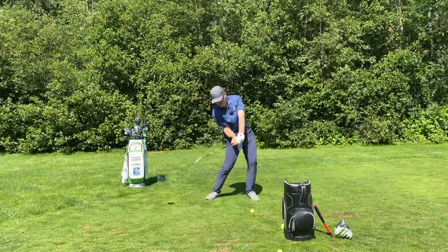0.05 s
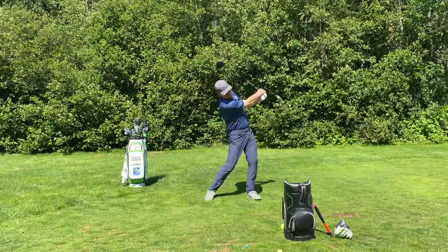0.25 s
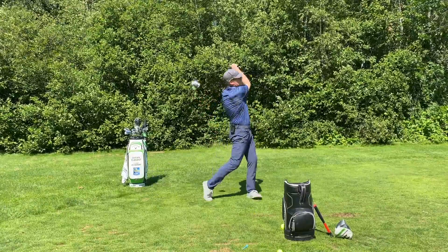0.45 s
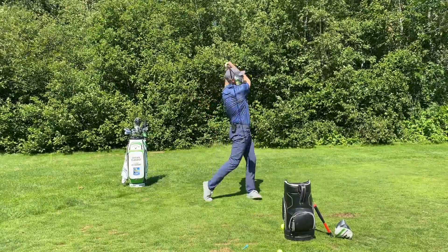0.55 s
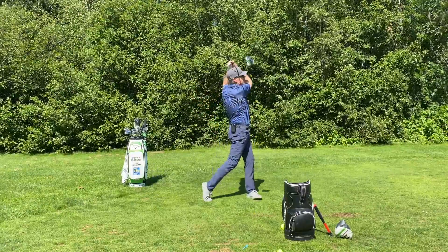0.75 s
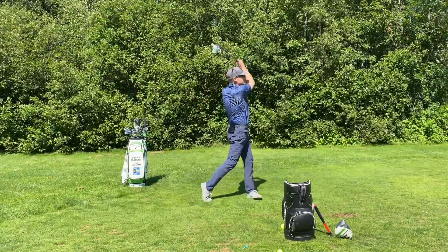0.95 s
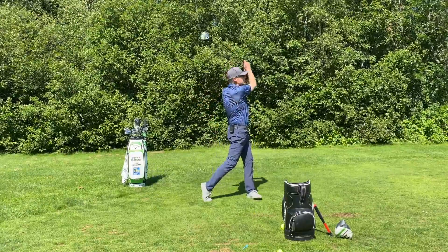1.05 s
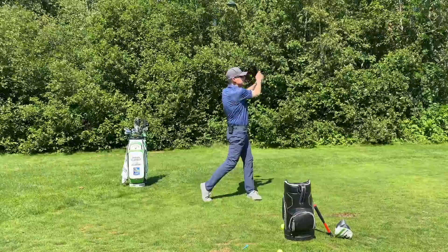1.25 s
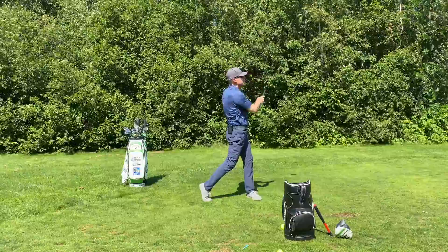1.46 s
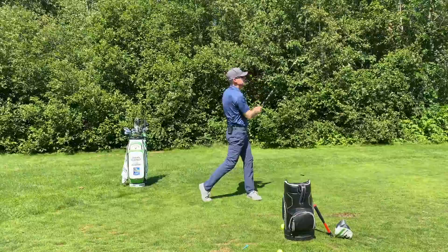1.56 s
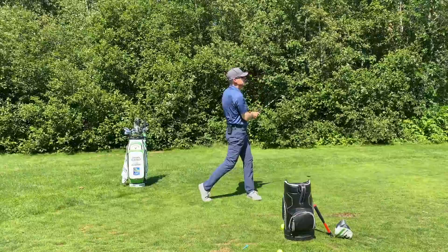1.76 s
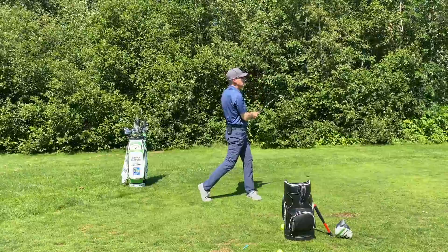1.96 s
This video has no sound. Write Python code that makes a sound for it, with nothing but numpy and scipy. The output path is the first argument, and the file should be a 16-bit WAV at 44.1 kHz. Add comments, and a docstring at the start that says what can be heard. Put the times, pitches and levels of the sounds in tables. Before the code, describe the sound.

Sharp metallic golf shot after a quick swish, fading into trees and a soft outdoor hush

```python
"""A golf driver cracks a ball off the tee: damped modes give a hollow knock, then the metal head rings.
Bursts of filtered noise add the shell's clash, and the crack briefly overloads the microphone.
Turf, trees and farther woods scatter it back as decaying noise; the club's swish is vortex tone and air rush.
Wind rumble dies away to a quiet outdoor hush of shaped noise, with soft scuffs of narrow-band noise.
Small clicks of gear, each a damped mode with a noise tick, come at the end."""
import sys
import numpy as np
from scipy import signal
from scipy.fft import rfft, irfft
from scipy.io import wavfile

SR = 44100
rng = np.random.default_rng(int(sys.argv[2]) if len(sys.argv) > 2 else 0)


def master(y):
    """Save y as 16-bit WAV."""
    cut = np.clip(np.atleast_2d(y).T, -1, 1)
    pcm = np.round(cut * 32767)  # scale
    wavfile.write(sys.argv[1], SR, pcm.astype(np.int16))


N = 88200
T = np.arange(N) / SR  # time, s

# Spectra hold relative levels: noise() scales each one to rms 1. T60 is the time to fall by 60 dB.

# Modes of the knock of ball on face: [f/Hz, level/dB, T60/s]
KNOCK_MODES = [(514.25, -11.5, .02), (1020, -9.5, 0.014), (1280, -6, .011), (1833, -6.5, .009),
               (2857, -7, 0.0074), (8265, -14.5, .005)]
# Modes of the hollow head: [f/Hz, level/dB, T60/s]
HEAD_MODES = [(2160, -38, .27), (3318.4, -28.5, 0.12), (3374, -23, .085), (3530, -24, .1),
              (4133, -18.5, .06), (4232.5, -16, .07), (4370, -25, 0.094), (4615, -31, 0.12),
              (4936, -20.5, 0.028), (5280, -14.5, .05), (5672, -21, .055), (6344, -20, .035),
              (6756, -28, .055), (7708, -24, 0.051), (8085, -17.5, 0.055), (8290, -23, .045),
              (8870, -16.5, 0.047), (9807, -26, .04), (9750, -25.5, 0.046), (10500, -22.5, .036),
              (10583, -20, .032)]
# Crowd of short-lived shell modes: [f/Hz, level/dB per Hz]
SHELL_SPECTRUM = [(400, -19), (1500, -17), (2900, -19.5), (3400, -9), (4000, -9), (4800, 3), (6000, -2),
                  (8000, 0.5), (10500, -1.5), (12500, -16.5), (14800, -11), (16000, -20)]
# First bright clash as the ball leaves: [f/Hz, level/dB per Hz]
CLASH_SPECTRUM = [(1500, -7.5), (2800, -5.5), (4000, 0), (8000, -2.5), (11000, -4), (12700, -13),
                  (14500, -4), (16000, -12)]
IMPACT_S = 0.1202  # the face meets the ball
RELEASE_S = 0.0022  # the head rings out this much later
HEAD_ATTACK_S = 0.00033
SHELL_DB, SHELL_T60_S = -13.5, 0.06
CLASH_DB, CLASH_T60_S = -10, 0.021

# Scatter off the turf close by: [f/Hz, level/dB per Hz]
TURF_SPECTRUM = [(300, 3.5), (800, 2.5), (1500, 0), (2800, -7), (5000, -1.5), (9000, -2), (12000, -11),
                 (15500, -16.5)]
# Scatter from the near trees: [f/Hz, level/dB per Hz]
TREE_SPECTRUM = [(200, -5.5), (900, -5.5), (1500, -8.5), (2200, -3), (3000, -7), (4200, -0.5), (5400, 3.5),
                 (6800, -3.5), (8500, -1.5), (11000, -8.5), (13000, -17.5), (15500, -20.5)]
# Scatter from the farther woods: [f/Hz, level/dB per Hz]
WOODS_SPECTRUM = [(200, 6), (800, 3.5), (1400, -1), (2500, -2.5), (4200, -5.5), (8000, -9.5),
                  (11000, -11.5), (15500, -21.5)]
TURF_DB, TURF_T60_S = -32, 0.13
TREES_DELAY_S, TREES_RISE_S = 0.042, 0.04  # shared by near trees, woods and ring echo
TREES_DB, TREES_T60_S = -42, 0.26
WOODS_DB, WOODS_T60_S = -51.5, 1.326
RING_ECHO_DB, RING_ECHO_T60_S = -55.5, 0.33
RING_ECHO_HALF_WIDTH_HZ = 12

# Vortex tone of the club, which follows its speed: [t/s, f/Hz, level/dB]
SWING_CURVE = [(0, 348.6, -78.5), (.04, 500.6, -50), (.072, 759.9, -53.5), (.088, 890.2, -34),
               (.108, 1079, -34.5), (.119, 1076, -40), (.136, 710.9, -35), (.16, 575.7, -47),
               (.18, 460.6, -47.5), (.22, 330, -89), (.3, 200, -82.5)]
# Broad rush of air around the club: [f/Hz, level/dB per Hz]
RUSH_SPECTRUM = [(150, 4.5), (600, 7), (1200, -2), (2000, -8), (4000, -15), (8000, -22), (12000, -31),
                 (16000, -43)]
VORTEX_HALF_WIDTH_HZ = 71
# The slower shaft sings at a share of the pitch; its level is relative to the vortex tone.
SHAFT_PITCH_SHARE, SHAFT_DB, SHAFT_HALF_WIDTH_HZ = 0.55, -2, 120
RUSH_PEAK_S, RUSH_PEAK_DB = 0.086, -41.5
RUSH_RISE_DB_PER_S, RUSH_FALL_DB_PER_S = 188.5, 259.5

# Soft scuffs and thuds of shoes on turf: [t/s, level/dB, centre f/Hz, Gaussian length/s]
SCUFFS = [(.035, -55, 700, 0.0031), (.05, -39.5, 1000, 0.0036), (.058, -49.5, 1150, 0.0022),
          (.334, -44, 260, 0.00331), (0.368, -43.5, 119.4, 0.006), (.687, -69, 743.8, 0.00858),
          (0.791, -65, 600, 0.00675)]
SCUFF_HALF_WIDTH_SHARE = 0.474  # of the centre frequency

# Small clicks of gear: [t/s, knock level/dB, tick level/dB, knock f/Hz, T60/s, tick edge f/Hz]
CLICKS = [(1.928, -78.5, -62.5, 2510, .04, 13960), (1.931, -69.5, -58, 3000, 0.0151, 13970),
          (1.9411, -45.5, -49.5, 1508, 0.00572, 6024), (1.968, -59, -66, 2060, 0.01475, 5000),
          (1.9762, -46.5, -55.5, 2076, 0.0313, 9500), (1.9825, -57.5, -56, 684, 0.0174, 8000),
          (1.986, -59, -64.5, 4400, 0.045, 7000), (1.993, -59, -61, 4623, 0.057, 5000),
          (1.9985, -47.5, -57, 1415, 0.0134, 5000)]
# Bright tick of a click: [f/Hz, level/dB per Hz]
TICK_SPECTRUM = [(300, 2), (2000, 1.5), (3200, -8.5), (4500, -2.5), (9500, -4.5), (12000, -7.5),
                 (16000, -20)]

# Wind on the microphone over time: [t/s, level/dB]
RUMBLE_LEVEL = [(0, -25), (.05, -39.5), (.075, -23), (.11, -28), (.15, -30.5), (.18, -41.5), (.21, -34.5),
                (.26, -42.5), (.36, -45), (.48, -48), (.54, -56.5), (.59, -50), (.64, -63.5), (.7, -55),
                (.8, -61), (1.3, -61.5), (1.66, -57), (1.75, -60), (2, -60.5)]
# Colour of the wind rumble: [f/Hz, level/dB per Hz]
RUMBLE_SPECTRUM = [(15, -4), (28, 4), (48, -2), (80, -7), (130, -13.5), (220, -21.5), (400, -33.5),
                   (1000, -58), (16000, -110)]
# Hush of leaves and distance over time: [t/s, level/dB]
HUSH_LEVEL = [(0.62, -76.5), (0.64, -70), (1.25, -71), (1.55, -69.5), (1.896, -70), (1.9, -70.5)]
# Colour of the hush: [f/Hz, level/dB per Hz]
HUSH_SPECTRUM = [(88, -32.5), (150, -2), (275, -16), (328, -11.5), (730, -9.5), (1060, -13.5), (1290, -15),
                 (1760, -17), (7770, -25), (14500, -36), (16000, -52.5)]

OVERLOAD = 0.58  # amplitude that the limiter approaches
OVERLOAD_HARDNESS = 8
CUTOFF_HZ = 15900


def from_db(db):
    """Amplitude ratio: 20 dB is a factor of ten."""
    return 10 ** (np.asarray(db) / 20)


def rms_one(x):
    """Normalisation by mean square: the result has rms 1."""
    return x / np.sqrt(np.mean(x ** 2) + 1e-20)


def in_time(rows):
    """Linear interpolation: each column of a curve table at every sample."""
    times, *columns = np.transpose(rows)
    return [np.interp(T, times, column) for column in columns]


def noise(spectrum):
    """Spectral shaping of white noise, falling 12 dB/octave more below the lowest point; rms 1."""
    hz, db = np.transpose(spectrum)
    f = np.arange(N // 2 + 1) * SR / N + 1e-6
    gain = from_db(np.interp(np.log(f), np.log(hz), db))
    gain = gain * np.minimum(f / hz[0], 1) ** 2
    white = rng.standard_normal(N)
    return rms_one(irfft(rfft(white) * gain, N))


def narrow_noise(hz, half_width_hz):
    """Quadrature modulation: slow noise carried on a fixed or moving pitch; rms 1."""
    low_pass = signal.butter(2, half_width_hz, fs=SR, output="sos")
    in_phase, quadrature = signal.sosfilt(low_pass, rng.standard_normal((2, N)))
    phase = 2 * np.pi * np.cumsum(hz * np.ones(N)) / SR
    return rms_one(in_phase * np.cos(phase) + quadrature * np.sin(phase))


def decay(start, t60, attack=1e-4):
    """Exponential damping, with a straight rise over the attack."""
    age = np.maximum(T - start, 0)
    return np.minimum(age / attack, 1) * from_db(-60 * age / t60)


def ring(start, hz, t60):
    """Free vibration of one struck mode: a damped sine."""
    return decay(start, t60) * np.sin(2 * np.pi * hz * (T - start))


def strike():
    """Modal superposition: knock of contact, then the head's modes and the noisy clash of its thin shell."""
    knock = 0
    for k, (hz, db, t60) in enumerate(KNOCK_MODES):
        knock = knock + (-1) ** k * from_db(db) * ring(IMPACT_S, hz, t60)  # alternating polarity

    free = IMPACT_S + RELEASE_S
    head = 0
    for hz, db, t60 in HEAD_MODES:
        tone = np.sin(2 * np.pi * (hz * T + rng.random()))  # random phase
        head = head + from_db(db) * decay(free, t60, HEAD_ATTACK_S) * tone

    shell = from_db(SHELL_DB) * decay(free, SHELL_T60_S, HEAD_ATTACK_S) * noise(SHELL_SPECTRUM)
    clash = from_db(CLASH_DB) * decay(free, CLASH_T60_S, HEAD_ATTACK_S) * noise(CLASH_SPECTRUM)
    return knock + head + shell + clash


def scatter():
    """Diffuse scattering: countless leaves and blades smear the crack into hiss, turf first, then trees."""
    back = IMPACT_S + TREES_DELAY_S
    turf = from_db(TURF_DB) * decay(IMPACT_S, TURF_T60_S, RELEASE_S) * noise(TURF_SPECTRUM)
    near = from_db(TREES_DB) * decay(back, TREES_T60_S, TREES_RISE_S) * noise(TREE_SPECTRUM)

    # The head's lowest, longest mode comes back too.
    ring_hz = HEAD_MODES[0][0]
    ring_echo = narrow_noise(ring_hz, RING_ECHO_HALF_WIDTH_HZ)
    ring_echo = from_db(RING_ECHO_DB) * decay(back, RING_ECHO_T60_S, TREES_RISE_S) * ring_echo

    woods = from_db(WOODS_DB) * decay(back, WOODS_T60_S, TREES_RISE_S) * noise(WOODS_SPECTRUM)
    return turf + near + ring_echo + woods


def swish():
    """Vortex shedding: pitch follows club speed, up into the ball and down after, over a rush of air."""
    hz, db = in_time(SWING_CURVE)
    vortex = narrow_noise(hz, VORTEX_HALF_WIDTH_HZ)
    shaft = from_db(SHAFT_DB) * narrow_noise(SHAFT_PITCH_SHARE * hz, SHAFT_HALF_WIDTH_HZ)
    swinging = T < SWING_CURVE[-1][0]
    tones = from_db(db) * (vortex + shaft) * swinging

    before_peak = RUSH_RISE_DB_PER_S * (RUSH_PEAK_S - T)
    after_peak = RUSH_FALL_DB_PER_S * (T - RUSH_PEAK_S)
    rush_db = RUSH_PEAK_DB - np.maximum(before_peak, after_peak)
    return tones + from_db(rush_db) * noise(RUSH_SPECTRUM)


def scuffs():
    """Friction noise: each scuff is a short Gaussian swell of band-limited noise."""
    total = 0
    for start, db, hz, length in SCUFFS:
        swell = np.exp(-0.5 * ((T - start) / length) ** 2)
        total = total + from_db(db) * swell * narrow_noise(hz, SCUFF_HALF_WIDTH_SHARE * hz)
    return total


def clicks():
    """Impact excitation: each click is a small damped knock with a low-passed noise tick."""
    tick = noise(TICK_SPECTRUM)
    total = 0
    for start, knock_db, tick_db, hz, t60, edge_hz in CLICKS:
        low_pass = signal.butter(2, edge_hz, fs=SR, output="sos")
        dulled = signal.sosfilt(low_pass, tick)
        total = total + from_db(knock_db) * ring(start, hz, t60)
        total = total + from_db(tick_db) * decay(start, t60) * dulled
    return total


def outdoors():
    """Turbulence and diffuse sound: wind rumble on the microphone and the hush of the range."""
    (rumble_db,) = in_time(RUMBLE_LEVEL)
    (hush_db,) = in_time(HUSH_LEVEL)
    rumble = from_db(rumble_db) * noise(RUMBLE_SPECTRUM)
    hush = from_db(hush_db) * noise(HUSH_SPECTRUM)
    return rumble + hush


def scene():
    """Linear superposition of the strike, its scatter, the swish and the quiet range; one channel."""
    mix = strike() + scatter() + swish() + scuffs() + clicks() + outdoors()
    return mix[None]


def record(dry):
    """Saturation and band limiting: the crack overloads the input, then a steep low-pass cuts the top."""
    overload = np.abs(dry / OVERLOAD) ** OVERLOAD_HARDNESS
    clipped = dry / (1 + overload) ** (1 / OVERLOAD_HARDNESS)
    # Order 10, 0.1 dB passband ripple, 80 dB stopband attenuation
    low_pass = signal.ellip(10, 0.1, 80, CUTOFF_HZ, fs=SR, output="sos")
    return signal.sosfilt(low_pass, clipped)


dry = scene()
out = record(dry)
master(out)
```